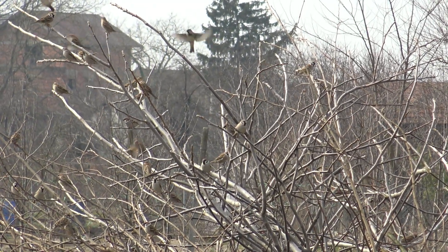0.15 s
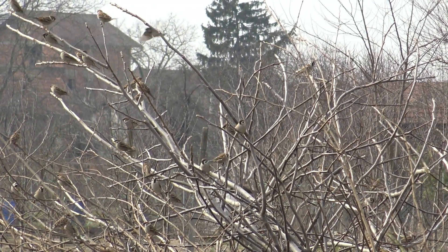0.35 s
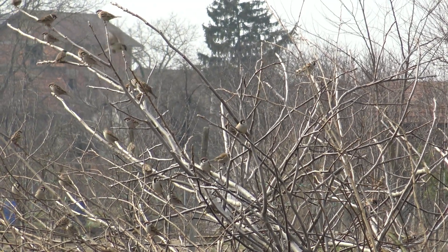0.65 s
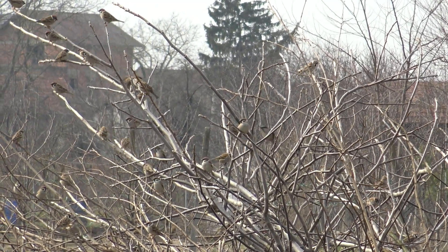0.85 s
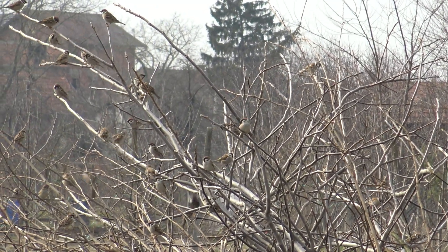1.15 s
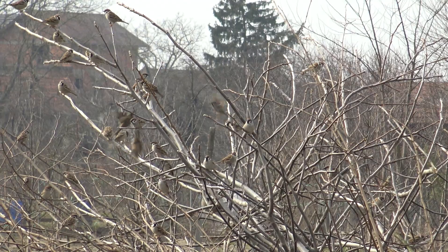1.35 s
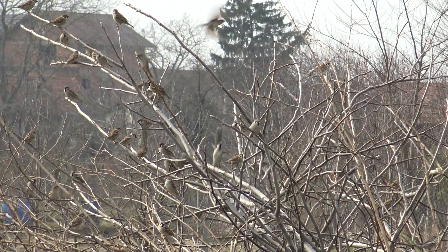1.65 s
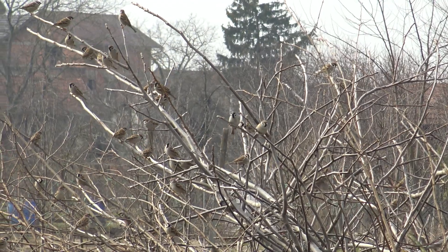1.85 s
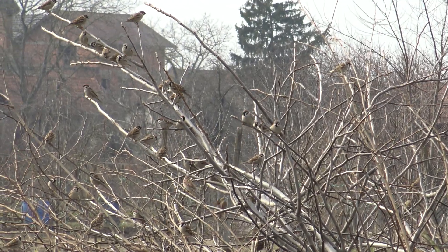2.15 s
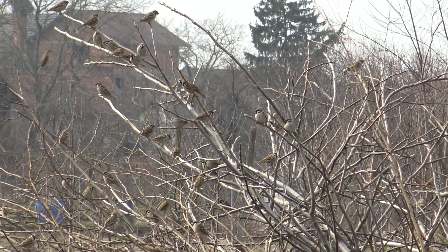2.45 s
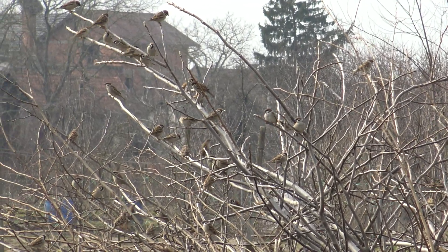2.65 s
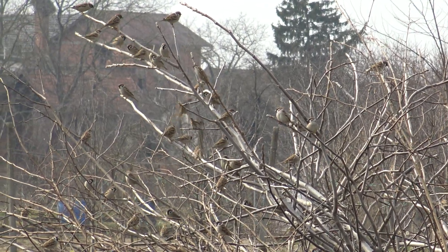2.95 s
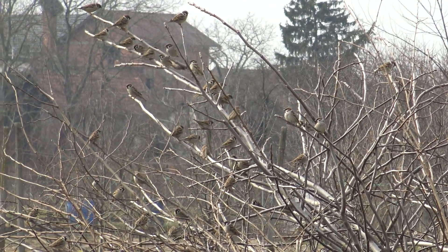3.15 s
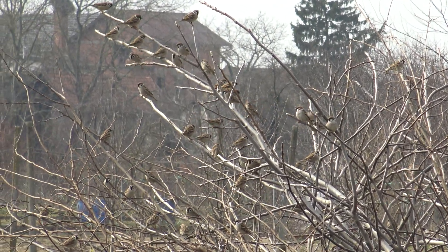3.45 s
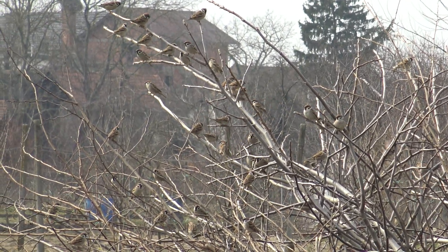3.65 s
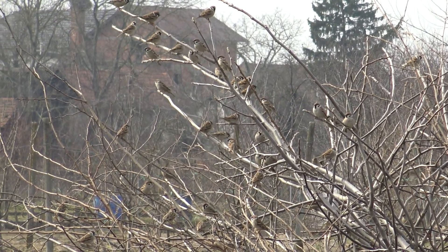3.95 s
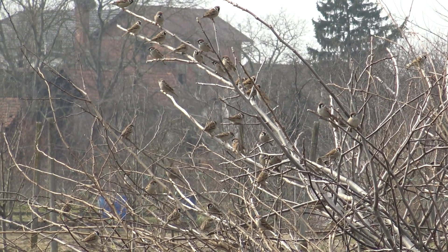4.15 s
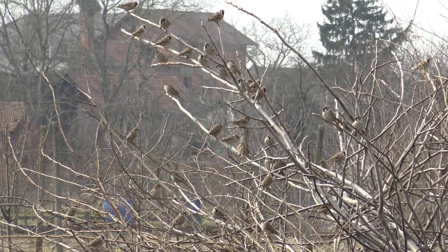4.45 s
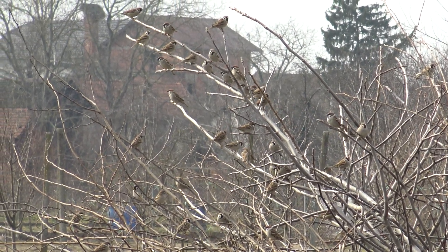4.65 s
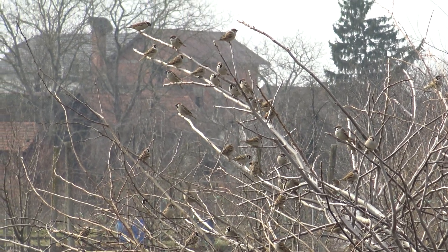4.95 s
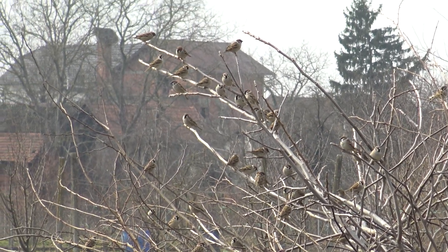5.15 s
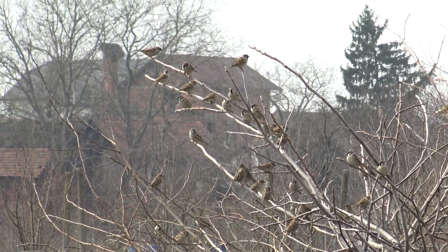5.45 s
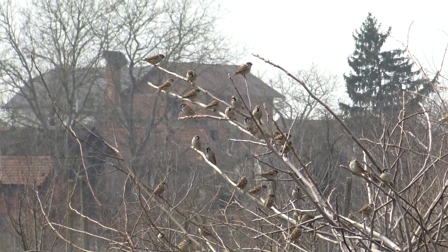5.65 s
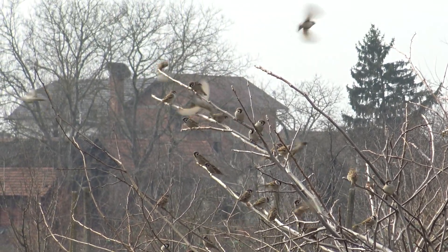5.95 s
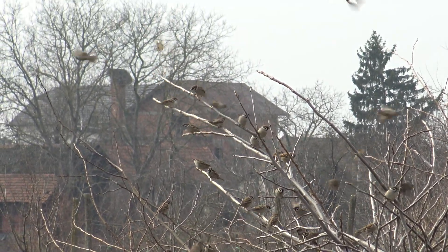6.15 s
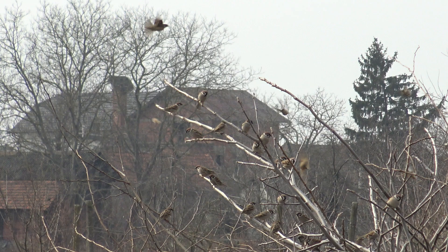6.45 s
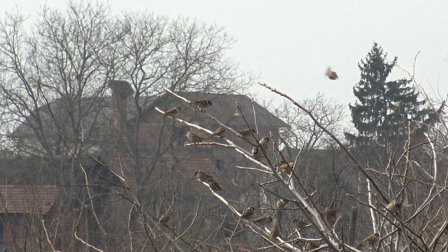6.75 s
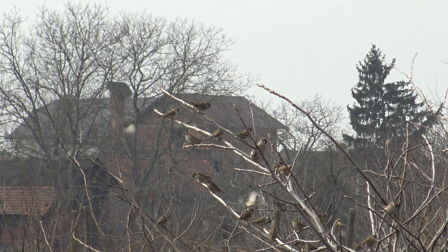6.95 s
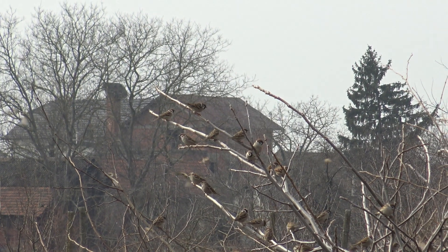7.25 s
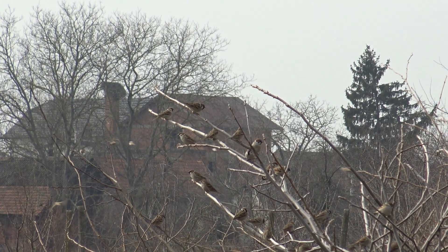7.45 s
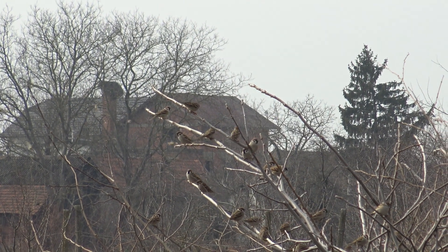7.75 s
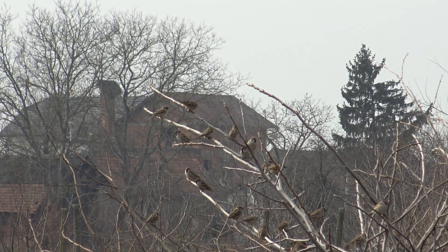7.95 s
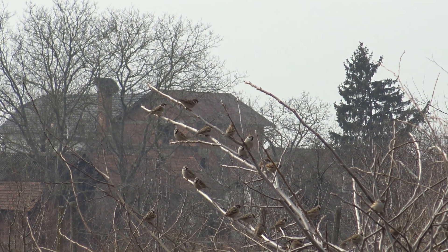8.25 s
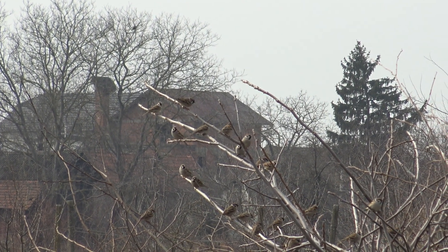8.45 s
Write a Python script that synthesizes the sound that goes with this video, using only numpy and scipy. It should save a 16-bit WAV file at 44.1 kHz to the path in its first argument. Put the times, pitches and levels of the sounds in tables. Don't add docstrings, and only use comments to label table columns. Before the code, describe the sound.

A harsh arched chirp opens immediately over soft outdoor air, faint microphone hiss, a far steady fan whine and a low engine hum. Scattered chirps up to 0.9 s grow into a dense overlapping bout from about 0.9 to 2.9 s: many sparrows, each call under a tenth of a second, buzzy and bright, some duller or hoarser, with quick falling whistles near 1.5 and 2.2 s and a twig tick at 2.6 s. From 3 to 5.5 s chirps are sparse, with lulls, faint twitters near 4.5 s and very thin high calls; distant cars swell softly. At 5.5 s wings stir; from 5.9 to 7 s they throb and rush, with claws scrabbling, twigs snapping and sliding whistles around 6.0-6.4 s. Chirps crowd together from 6.4 to 7.6 s. Then mostly quiet air, with small twig ticks and weak peeps from 8.2 to 8.6 s. Short wall echoes follow the birds.

```python
import sys
import numpy as np
from scipy import signal
from scipy.fft import rfft, irfft, next_fast_len
from scipy.io import wavfile
from scipy.ndimage import uniform_filter1d

SR = 44100
rng = np.random.default_rng(int(sys.argv[2]) if len(sys.argv) > 2 else 0)


def to_wav(s):
    ch = np.atleast_2d(s).T
    pcm = np.round(np.clip(ch, -1, 1) * 32767)
    wavfile.write(sys.argv[1], SR, pcm.astype(np.int16))


def elevation(decibels):
    levels = np.asarray(decibels, float)
    return 10 ** (levels / 20)


N = 378819


def unit(x):
    return x / np.sqrt(np.mean(x ** 2) + 1e-20)


def along(points, hz):
    f, v = np.transpose(points)
    return np.interp(np.log(hz + 1), np.log(f + 1), v)


def curves(rows):
    s, *cols = np.transpose(rows)
    return [np.interp(np.arange(N) / SR, s, c) for c in cols]


def wobble(rate, shape=(), size=N):
    knots = rng.standard_normal((*shape, int(size * rate / SR) + 4))
    i, u = np.divmod(np.arange(size) * rate / SR, 1)
    a, b, c, d = (knots[..., i.astype(int) + k] for k in range(4))
    cubic = 3 * (b - c) + d - a
    square = 2 * a - 5 * b + 4 * c - d
    return b + u / 2 * (c - a + u * (square + u * cubic))


def filtered(x, response):
    m = next_fast_len(N + SR // 2)
    return irfft(rfft(x, m) * response(np.fft.rfftfreq(m, 1 / SR)), m)[..., :N]


# hz, correlation (0-1)
COHERENCE = [(60, 1), (130, 0.9), (290, 0.83), (640, 0.92), (1410, 0.96), (3100, 0.96), (6820, 0.54),
             (15000, 0.89)]


def rush(gain):
    def mid_side(hz):
        turn = np.arccos(np.clip(along(COHERENCE, hz), -1, 1)) / 2
        return gain(hz) * [np.cos(turn), np.sin(turn)]

    mid, side = filtered(rng.standard_normal((2, N)), mid_side)
    return unit(np.array([mid + side, mid - side]))


def peaks(modes):
    return lambda f: sum(elevation(db) / (1 + (2 * (f - hz) / width) ** 2) for hz, width, db in modes)


def add(out, x, s, pan_db):
    i = round(s * SR)
    x = x[max(-i, 0):][:N - max(i, 0)]
    out[:, max(i, 0):max(i, 0) + len(x)] += x * elevation([[pan_db / 2], [-pan_db / 2]])


# hz, level_db (per Hz)
AIR = [(15, -46), (25, -10), (53, -9), (101, -10.5), (129, -14), (331, -19.5), (434, -20.5), (568, -16.5),
       (873, -20), (1080, -20), (2370, -28), (2560, -27.5), (4640, -30), (7940, -32), (15600, -37)]
# hz, width_hz, level_db
FAN = [(1045.6, 20, 6.5), (1112, 124, 2)]
# nearest_s, half_passage_s, drone_db
CARS = [
    (.82, 0.28, -53.5),
    (1.9, 0.36, -60.5),
    (3.85, 0.3, -53.5),
    (5.2, 0.2, -58),
    (6.07, 0.14, -79),
    (6.62, 0.073, -51),
    (6.95, 0.2, -53),
    (7.96, 0.23, -62.5),
]
# time_s, level_db
ENGINE = [(0.0, -68), (1.03, -59.5), (1.17, -63), (2.37, -61.5), (3.09, -72), (3.37, -61.5), (5.98, -66),
          (6.34, -57), (6.79, -67), (7.99, -61.5), (8.57, -72), (8.59, -75)]


def background():
    t = np.arange(N) / SR
    air_db = -57.5 + 0.45 * wobble(3.4) - 0.92 * t * SR / N
    air = elevation(air_db) * rush(lambda f: elevation(along(AIR, f)) * np.clip(f / 90, 0.4, 1))
    whine = elevation(-66.5 + 0.2 * wobble(2.74)) * rush(peaks(FAN))

    passing = np.sqrt(sum(elevation(2 * db) / (1 + ((t - s) / half) ** 4) for s, half, db in CARS))
    drone_noise = rush(peaks([(315, 120, -0.29), (434, 106, -1.7)]))
    drone = passing * elevation(-7.5 + 1.5 * wobble(8)) * drone_noise

    hum_db, = curves(ENGINE)
    firing_hz = 48.9 + 0.79 * wobble(4.03)
    engine = np.sqrt(2) * np.sin(2 * np.pi * np.cumsum(firing_hz) / SR)
    rumble = 0.48 * rush(peaks([(47.7, 14, 0)]))
    hum = elevation(hum_db - 1.0) * (engine * elevation(wobble(5.5)) + rumble)
    return air + whine + drone + hum


# time_s, level_db
WINGS = [
    (5.5, -57),
    (5.75, -63.5),
    (5.9, -55),
    (5.98, -56),
    (6.06, -52),
    (6.4, -51),
    (6.79, -52),
    (7.1, -70),
]
# hz, level_db (per Hz)
FEATHER = [(400, -7.5), (620, -1.5), (850, -18), (1200, -14), (2500, -11.5), (6000, -20), (12000, -32)]
# hz, width_hz, level_db
THROB = [(81.7, 16, -5), (133, 13, -10)]


def wings():
    throb_db, = curves(WINGS)
    t = np.arange(N) / SR
    rush_db = -57 + 2.6 * (throb_db - throb_db.max()) - 12.5 * (t - 6.06)
    aloft = np.clip(np.minimum(t - WINGS[0][0], WINGS[-1][0] - t) / 0.036, 0, 1)
    beats = elevation(1.5 * wobble(60))
    throb = elevation(throb_db - 5.0) * rush(peaks(THROB))
    feathers = unit(beats * rush(lambda f: elevation(along(FEATHER, f))))
    return aloft * (throb + elevation(rush_db + 6.5) * feathers)


# start_s, peak_db, ring_hz, crack_share (0-1)
TICKS = [(2.576, -36, 1500, .6), (2.94, -46, 4000, .8), (4.495, -46, 300, .1), (6.517, -37, 3500, .8),
         (6.826, -34, 4000, .8), (3.188, -50, 1100, .3), (6.042, -45, 4500, .9), (6.104, -42, 8500, .8),
         (6.104, -46, 2000, .9), (8.208, -40, 3500, .85), (8.21, -47, 800, .1), (8.291, -39, 1450, .3),
         (8.324, -48, 2700, .6), (8.496, -50, 2700, .3)]
# start_s, peak_db, ring_hz
CRACKLES = [
    (5.9633, -45, 1850),
    (5.987, -48, 4690),
    (6.0206, -49, 3430),
    (6.103, -34, 1560),
    (6.1254, -48, 2450),
    (6.1608, -39, 3990),
    (6.2476, -42, 5710),
    (6.268, -43, 4520),
    (6.317, -36, 4110),
]


def twigs():
    out, t = np.zeros((2, N)), np.arange(600) / SR
    crackles = [(s, db - 8, hz, 0.95) for s, db, hz in CRACKLES]
    for s, db, hz, share in TICKS + crackles:
        band = signal.butter(2, [hz / 4, min(2.5 * hz, 11000)], "band", fs=SR)
        crack = signal.lfilter(*band, 1.5 * rng.standard_normal(len(t))) * elevation(-60 * t / 0.014)
        ring = np.sin(2 * np.pi * hz * t) * elevation(-60 * t / 0.013)
        onset = np.minimum(t / 0.0006, 1)
        add(out, elevation(db) * (share * crack + (1 - share) * ring) * onset, s, 0)
    return out


# time_s, pitch_hz, level_db
WHISTLES = [
    [(5.74, 5624, -72), (5.754, 4640, -60), (5.776, 4520, -63), (5.82, 5500, -60), (5.856, 5900, -53),
     (5.872, 5850, -64), (5.9, 5700, -72)],
    [(5.98, 5700, -64), (5.989, 4750, -56), (6.005, 3900, -61), (6.03, 3250, -61), (6.052, 3050, -59),
     (6.09, 5050, -56), (6.113, 5150, -60), (6.125, 5600, -59), (6.131, 5250, -61)],
    [(5.96, 2050, -57), (5.98, 1500, -63), (5.995, 1700, -61), (6.024, 3300, -56), (6.04, 4450, -56),
     (6.051, 4550, -55)],
    [(6.16, 2000, -56), (6.17, 3700, -55), (6.177, 4400, -55), (6.188, 4000, -59)],
    [(6.159, 2300, -62), (6.168, 4600, -61), (6.176, 5700, -57), (6.185, 2950, -57)],
    [(6.305, 3000, -61), (6.315, 2350, -60), (6.326, 2150, -59), (6.338, 2800, -57)],
    [(2.18, 7600, -57), (2.195, 4570, -52), (2.22, 2430, -48)],
    [(1.455, 7200, -62), (1.47, 4200, -57), (1.485, 2900, -49)],
    [(3.345, 5130, -86), (3.361, 4120, -60), (3.391, 3520, -64), (3.431, 5080, -63), (3.45, 4905, -73)],
    [(3.67, 4438, -64), (3.696, 4000, -70), (3.73, 4300, -60.5), (3.74, 4433, -77)],
]
# time_s, pitch_hz, level_db
SQUABBLE = [
    [(6.25, 2000, -60), (6.275, 2650, -58), (6.295, 4250, -55), (6.325, 4050, -53), (6.342, 3600, -60)],
    [(6.345, 3850, -58), (6.37, 3600, -56), (6.4, 3050, -54)],
    [(6.34, 4200, -61), (6.355, 4450, -58), (6.39, 3700, -60)],
    [(6.285, 3500, -60), (6.31, 3600, -55), (6.335, 3250, -52), (6.35, 3000, -57)],
]
# start_s, length_s, start_hz, final_db
SEETS = [
    (4.64, .07, 8250, -77),
    (4.88, .335, 8350, -74),
    (5.4, .34, 8220, -75),
    (5.94, .3, 8200, -75),
]
# start_s, length_s, start_hz, end_hz, level_db
TWITTER = [(6.128, .014, 4300, 2100, -56), (4.5, .03, 2900, 2500, -69), (4.52, .045, 2050, 1750, -69),
           (6.203, .009, 6000, 4400, -60), (6.208, .012, 9500, 6500, -63), (6.313, .009, 7600, 5500, -59),
           (6.263, .018, 4300, 4700, -54), (4.61, .04, 2800, 3900, -68), (4.39, .02, 2200, 2150, -68),
           (8.575, .012, 5000, 4000, -66), (6.26, .03, 5300, 5800, -62), (6.368, .03, 1800, 2800, -53),
           (5.805, .025, 2900, 3800, -64), (6.14, .03, 3600, 4200, -61), (6.215, .012, 3500, 3100, -61),
           (3.745, .03, 5000, 4200, -67), (8.52, .01, 4800, 7400, -60), (8.53, .02, 7200, 3600, -66),
           (8.519, .01, 2000, 3900, -56), (8.535, .012, 9200, 6000, -66), (4.492, .035, 2000, 1600, -64)]
# start_s, length_s, top_hz, rise_hz, level_db
PEEPS = [(4.355, .02, 2600, 100, -68), (8.53, .02, 3500, 1300, -67), (6.34, .025, 4450, 350, -59),
         (6.243, .01, 5750, 0, -59), (5.955, .018, 5500, 150, -59), (8.33, .03, 2450, 250, -60),
         (8.332, .03, 3700, 500, -61), (8.375, .015, 2450, 50, -66), (8.51, .035, 3800, 1700, -65),
         (8.333, .015, 4800, 200, -72), (8.555, .03, 3700, 500, -69), (4.355, .02, 2300, 250, -65),
         (4.36, .015, 3100, 200, -66)]


def whistles():
    shapes = [(s, length, a, (a + b) / 2, b, db) for s, length, a, b, db in TWITTER]
    shapes += [(s, length, top - rise, top, top - rise, db) for s, length, top, rise, db in PEEPS]
    slurs = [[(s, a, db - 4), (s + length / 2, b, db + 2.5), (s + length, c, db - 4)]
             for s, length, a, b, c, db in shapes]
    seets = [[(s, hz, db - 4), (s + length, hz - 1600 * length, db)] for s, length, hz, db in SEETS]
    out = np.zeros((2, N))
    for rows in slurs + WHISTLES + SQUABBLE + seets:
        s, hz, db = np.transpose(rows)
        t = np.arange(s[0], s[-1], 1 / SR)
        waver = wobble(500, size=SR // 2)[:len(t)]
        flicker = wobble(130, size=SR // 2)[:len(t)]
        glide = uniform_filter1d(np.interp(t, s, hz), size=120, mode="nearest")
        waver_hz = min(45, 4.5 / (s[-1] - s[0]))
        phase = 2 * np.pi * np.cumsum(glide + waver_hz * waver) / SR
        edge = np.clip(np.minimum(t - s[0], s[-1] - t) / 0.003, 0, 1)
        level = np.sqrt(2) * edge * elevation(np.interp(t, s, db) + 3 * flicker)
        tone = np.sin(phase) + elevation(-22) * np.sin(2 * phase)
        add(out, level * tone, s[0], rng.normal(0, 0.5))
    return out


def vocal_tract(hz, c, open_hz, beak_db, held, loss_db):
    centre_hz = open_hz + (2900 - open_hz) * c ** 1.57
    sliding = 1 / (1 + ((hz - centre_hz) / 1100) ** 2) ** 2.3
    gape = np.minimum(c / 0.33, 1) / (1 + (c / held) ** 6)
    beak = elevation(beak_db) * gape / (1 + ((hz - 5500) / 600) ** 2)
    shrill = elevation(-21) * (open_hz / 5400) ** 4 * np.sin(np.pi * c ** 0.51) ** 2
    overblown = shrill / (1 + ((hz - 12000) / 1200) ** 2)
    bush = elevation(-4) * np.sin(np.pi * c) / (1 + ((hz - 4200) / 260) ** 2)
    windpipe = elevation(-8 - loss_db - 10 * c ** 3) / (1 + ((hz - 1950) / 300) ** 2)
    broad = elevation(-8.0) / (1 + (hz / (6800 - 2500 * c)) ** 8)
    return sliding + beak + overblown + windpipe + bush + broad + elevation(-30)


# order, level_db
SYRINX = [(2, -16), (3, -9), (4, 0), (5, -20), (6, 0), (7, -3), (8, 1), (9, -1), (10, 0)]
# start_s, length_s, top_pitch_hz, level_db, crest_place (0-1)
DULL_BIRD = [(-0.018, 0.088, 526, -49, 0.57), (0.363, 0.075, 523, -51, 0.43),
             (0.796, 0.086, 511, -50.5, 0.54), (1.5, 0.069, 528, -46.5, 0.62), (1.52, 0.084, 542, -57, 0.7),
             (1.938, 0.078, 528, -48, 0.46), (2.592, 0.077, 526, -49.5, 0.5),
             (2.668, 0.069, 523, -51.5, 0.61), (5.481, 0.071, 512, -53.5, 0.4),
             (6.724, 0.11, 517, -50, 0.37), (7.034, 0.087, 525, -53, 0.34),
             (7.227, 0.081, 528, -53.5, 0.55), (7.26, 0.071, 532, -50, 0.24)]
MIDDLE_BIRD = [(0.989, 0.068, 530, -46.5, 0.46), (1.134, 0.091, 503, -47, 0.37),
               (1.302, 0.051, 501, -47.5, 0.38), (1.649, 0.071, 534.4, -46.5, 0.51),
               (2.182, 0.084, 513, -47.5, 0.7), (2.277, 0.072, 529, -46, 0.7),
               (2.407, 0.092, 527, -48, 0.71), (2.498, 0.074, 511, -46, 0.61),
               (3.075, 0.074, 519, -51, 0.52), (4.792, 0.08, 525, -50.5, 0.63),
               (4.936, 0.075, 529, -49.5, 0.56), (6.546, 0.073, 518, -46.5, 0.4),
               (7.09, 0.058, 520, -49, 0.32), (7.451, 0.067, 526, -48.5, 0.47)]
BRIGHT_BIRD = [(1.405, 0.084, 500, -51, 0.46), (2.341, 0.067, 499, -44, 0.62),
               (2.565, 0.063, 522, -44.5, 0.75), (2.8, 0.091, 504.5, -48.5, 0.64),
               (2.811, 0.077, 506, -55, 0.68), (4.205, 0.053, 502, -51.5, 0.63),
               (6.777, 0.079, 499, -45, 0.46), (7.167, 0.075, 499.5, -45, 0.47),
               (7.381, 0.077, 501, -48.5, 0.4), (7.58, 0.071, 507, -50.5, 0.47)]
LEVEL_BIRD = [(0.171, 0.073, 482, -50, 0.45), (2.066, 0.07, 474, -47.5, 0.68),
              (3.812, 0.071, 480, -49.5, 0.52), (3.995, 0.069, 478.5, -49, 0.66),
              (5.311, 0.067, 464, -47.5, 0.67), (6.462, 0.07, 474, -48.5, 0.58),
              (6.627, 0.065, 491, -46.5, 0.444), (6.954, 0.074, 483, -45.5, 0.51)]
HOARSE_BIRD = [(0.926, 0.074, 455, -49.5, 0.63), (1.047, 0.06, 493, -46.5, 0.65),
               (1.176, 0.065, 543.4, -43.5, 0.69), (1.45, 0.063, 508, -48.5, 0.56),
               (2.454, 0.086, 517, -57, 0.42), (2.692, 0.078, 529, -55.5, 0.295),
               (3.252, 0.065, 505, -49.5, 0.51), (6.383, 0.075, 519, -45.5, 0.53),
               (6.448, 0.054, 473, -48, 0.73), (6.805, 0.07, 524, -50, 0.41)]
# open_throat_hz, pitch_rise (share), pitch_fall (share), beak_db, beak_held (0-1), kick (share)
MANNERS = [
    (4200, 0.19, 0.54, -14, 0.6, 0.0072),
    (4920, .19, 0.29, -5, 0.43, 0.007),
    (5720, .16, 0.37, 0, 0.52, .01),
    (5400, .13, 0.206, 0.5, 0.52, 0.061),
    (5000, .15, .3, -4.5, 0.56, 0.013),
]
# rasp_rad, windpipe_loss_db
HOARSENESS = [
    (.35, 1),
    (.35, 1),
    (.4, 2),
    (.33, 0),
    (.9, 6),
]
# hz, level_db
PATH = [(900, -2.5), (1500, 7), (2000, 1.9), (3000, 4.5), (3700, 2.5), (4200, 1.5), (4800, 1.5),
        (5400, 3.5), (6200, 7.5), (7000, 6.5), (8500, 1), (13000, -3)]


def chirps():
    out, order = np.zeros((2, N)), np.arange(2, 29)[:, None]
    source = elevation(np.interp(order, *np.transpose(SYRINX)))
    birds = (DULL_BIRD, MIDDLE_BIRD, BRIGHT_BIRD, LEVEL_BIRD, HOARSE_BIRD)
    calls = [(row, manner, voice) for bird, manner, voice in zip(birds, MANNERS, HOARSENESS) for row in bird]
    n = SR // 9
    shape = (len(order),)
    for (s, length, top_hz, db, crest), manner, (rough, loss_db) in calls:
        open_hz, rise, fall, beak_db, held, kick = manner
        u = np.arange(n) / SR / length
        c = np.minimum(u, 1)
        rising = rise * np.abs(1 - c / crest) ** 1.6
        falling = fall * np.abs((c - crest) / (1 - crest)) ** 2.6
        sag = np.where(c < crest, rising, falling)
        jitter = 0.0025 * wobble(400, size=n) + 0.0078 * wobble(70, size=n)
        pitch = top_hz * (1 - sag) * (1 + jitter)
        bump = 2 * np.exp(-((c - crest) / 0.16) ** 2) - 0.5
        hz = order * pitch * (1 + (order == 4) * kick * bump)

        throat = source * vocal_tract(hz, c, open_hz, beak_db, held, loss_db)
        throat = throat / np.sqrt(np.sum(throat ** 2, axis=0) / 2)
        throat = throat * elevation(2 * wobble(120, shape, size=n) + 2.3 * wobble(45, shape, size=n))
        rasp = rough * np.clip(order / 8 - 0.2, rough / 2, 1) * (1.2 - 0.45 * c) * wobble(450, shape, size=n)
        phase = 2 * np.pi * np.cumsum(hz, axis=1) / SR + rng.uniform(0, 2 * np.pi, order.shape)
        tone = np.sum(throat * np.sin(phase + rasp), axis=0)
        ramp = np.clip(np.minimum(u / 0.37, (1.05 - u) / 0.25), 0, 1)
        swell = np.sin(np.pi / 2 * ramp) ** 0.75
        add(out, elevation(db + 1.5) * swell * tone, s, rng.normal(0, 0.3))
    return filtered(out, lambda f: elevation(along(PATH, f)))


# delay_s, level_db
WALLS = [
    (.011, -20),
    (.028, -16),
    (.05, -19),
    (.085, -20),
    (.103, -22),
    (.16, -28),
]
# hz, t60_s
YARD = [(1000, 0.54), (4000, 0.41), (10000, 0.0096)]


def yard(x):
    noise = rng.standard_normal((2, SR // 2)) + 21.0 * rng.standard_normal(SR // 2)
    hz, t, z = signal.stft(noise, SR, nperseg=256)
    tail = signal.istft(z * elevation(-60 * t / along(YARD, hz)[:, None]), SR, nperseg=256)[1]
    tail = elevation(-14) * tail / np.linalg.norm(tail[0])
    smear = np.hanning(700)
    for s, db in WALLS:
        echo = smear * rng.standard_normal(len(smear)) / np.linalg.norm(smear)
        add(tail, elevation(db) * echo, s, rng.normal(0, 0.4))
    return signal.fftconvolve(x, tail, axes=1)[:, :N]


def scene():
    flock = chirps() + whistles() + twigs()
    return flock + yard(flock) + wings() + background()


def roll_off(x):
    return signal.sosfilt(signal.butter(12, 15720, fs=SR, output="sos"), x)


# hz, left_minus_right_db
LEAN = [(60, -1.1), (180, -0.5), (550, 1.0), (1650, -1.2), (4970, -1.33), (15000, 0.16)]


def record(dry):
    def lean(hz):
        half_db = along(LEAN, hz) / 2
        return elevation([half_db, -half_db])

    return roll_off(filtered(dry, lean))


dry = scene()
out = record(dry)
to_wav(out)
```